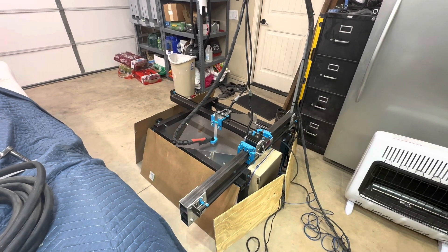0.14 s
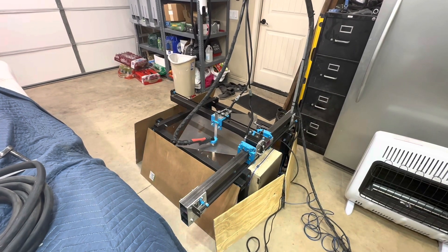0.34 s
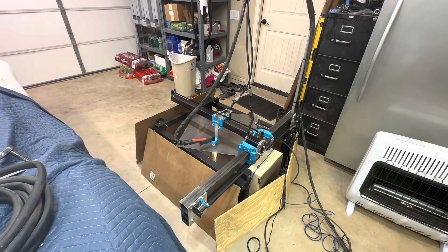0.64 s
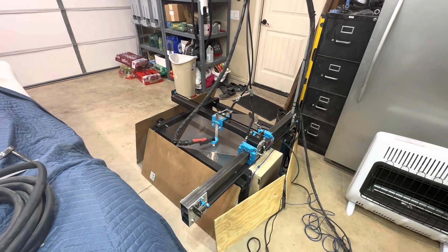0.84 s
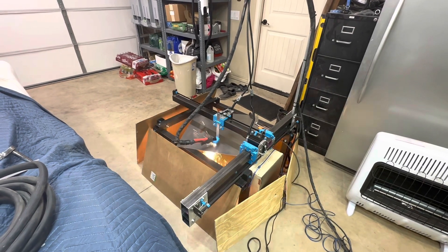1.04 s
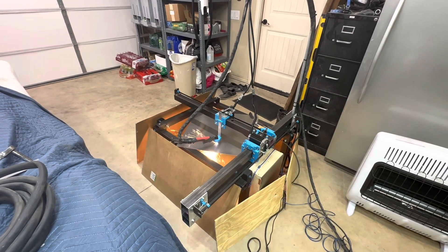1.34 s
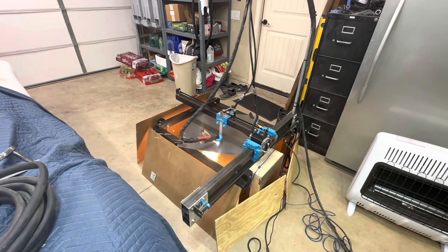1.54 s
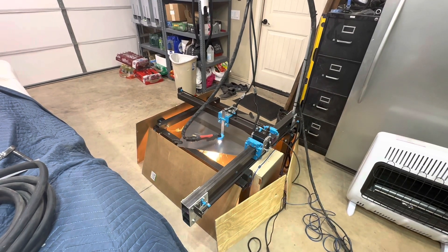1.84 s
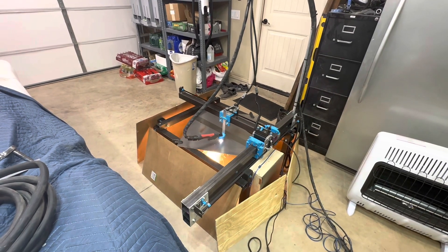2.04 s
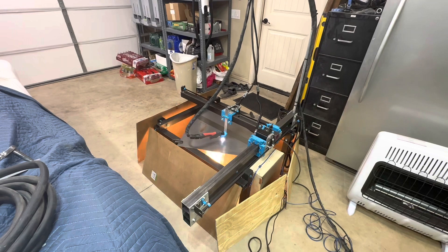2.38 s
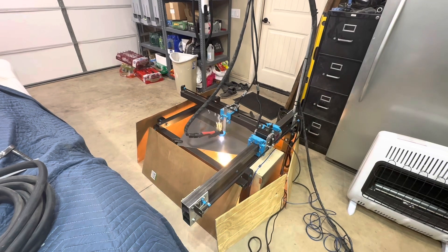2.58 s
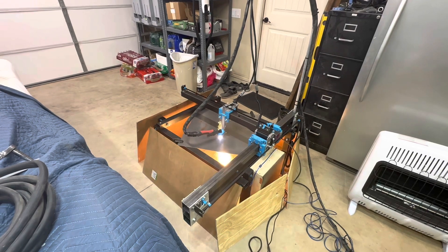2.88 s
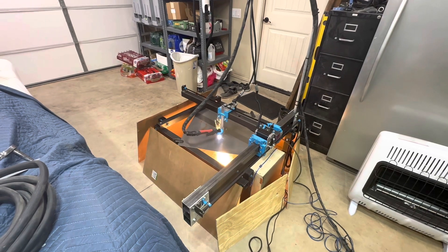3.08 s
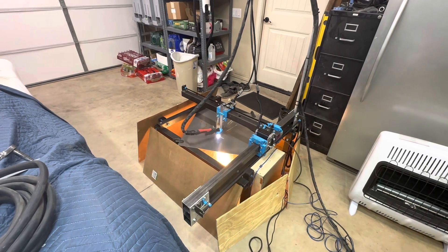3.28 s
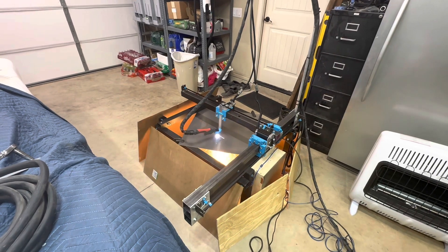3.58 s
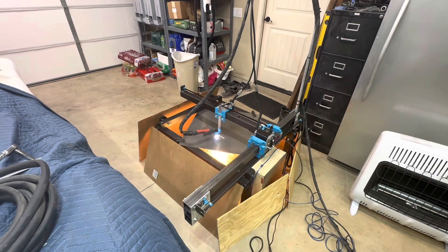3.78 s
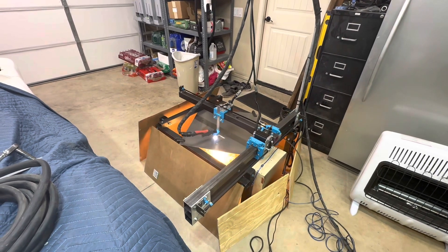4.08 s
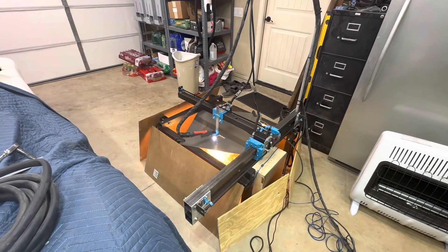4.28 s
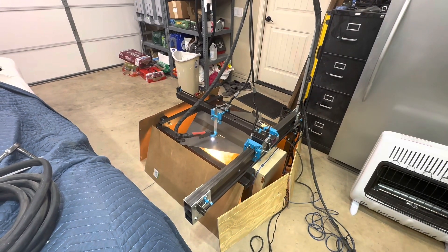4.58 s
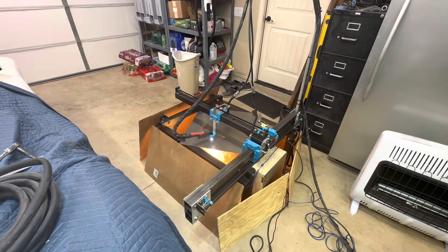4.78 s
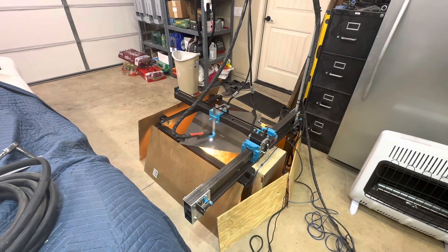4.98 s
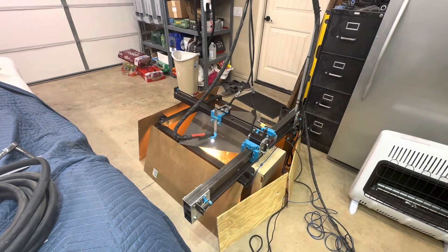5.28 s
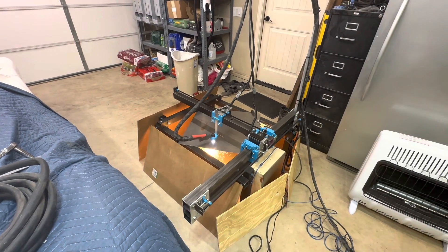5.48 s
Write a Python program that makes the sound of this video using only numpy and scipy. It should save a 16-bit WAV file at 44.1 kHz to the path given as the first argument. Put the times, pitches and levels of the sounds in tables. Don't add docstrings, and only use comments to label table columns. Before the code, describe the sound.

A plasma torch strikes with a thump and air blast, shrieks briefly while piercing sheet metal, then hisses steadily in a garage.

```python
import sys
import numpy as np
from scipy import signal
from scipy.fft import rfft, irfft
from scipy.io import wavfile
from scipy.ndimage import uniform_filter1d

SR = 44100
rng = np.random.default_rng(int(sys.argv[2]) if len(sys.argv) > 2 else 0)


def persist_wave(psi):
    counts = np.round(np.clip(psi, -1, 1) * 32767).astype(np.int16)
    wavfile.write(sys.argv[1], SR, np.atleast_2d(counts).T)


def linear_from_db(decibels):
    return 10 ** (np.asarray(decibels, float) / 20)


N = 248283
HOP = 256


def evened(x):
    return x / np.sqrt(np.mean(x ** 2) + 1e-20)


def read(points, hz, axis=1):
    table = np.transpose(points)
    return np.interp(np.log(hz + 1), np.log(table[0] + 1), table[axis])[:, None]


def drift(frames, low_hz, high_hz):
    t = np.arange(frames) * HOP / SR
    rates_hz = np.geomspace(low_hz, high_hz, num=40)
    return evened(sum(np.sin(2 * np.pi * (f * t + rng.random())) / np.sqrt(f) for f in rates_hz))


def bump(t, middle_s, half_length_s, db):
    return db * np.exp(-((t - middle_s) / half_length_s) ** 2)


# start_s, level_db, focus_db (toward the listener)
JET_COURSE = [(0.0, -51, 7.5), (0.026, -28.5, -1), (0.061, -25, -8), (0.11, -26, -2.5), (0.17, -28.5, 1.5),
              (0.24, -33, 2), (0.4, -34.5, 2), (0.58, -36, -2), (0.76, -39.5, 5.5), (0.9, -36, 0),
              (1.15, -38.5, 2), (1.75, -37, 1), (2.6, -36, 1), (2.9, -36.5, 3.5), (3.3, -37, 2),
              (3.6, -35, -0.5), (4.9, -36, 0.5), (5.63, -35, -1)]
# pitch_hz, level_db (per Hz)
JET_COLOUR = [(55, -10), (110, -15.5), (200, -15), (350, -11.5), (440, -17), (560, -9.5), (850, -7.5),
              (1300, -1.5), (4600, 1.5), (7600, 0), (11000, 0), (13000, -2.5), (15500, -1), (17000, -3)]
# pitch_hz, width_hz, level_db
SLOT_RINGS = [(5765, 870, 0), (9200, 400, -14)]
# start_s, pitch_hz, level_db (against the jet colour)
CRATER = [(.02, 2100, 4), (.055, 2070, 7), (.12, 1480, -14), (.2, 1190, 5.5), (.27, 1050, -2.5),
          (.33, 1000, -12)]
# pitch_hz, width_hz, level_db
TRAY_MODES = [(492.6, 55, -5), (680, 64, -4.5), (814, 93, -5), (1000, 47, -7), (1115, 220, -4),
              (1480, 99, -3)]
# middle_s, half_length_s, level_db
POOL_CHURN = (0.37, 0.09, 2.8)
# middle_s, half_length_s, level_db
SLOT_CHOKED = (0.47, 0.14, -11)
CUT_DB = -36.5
RING_DB, RING_FOCUS, RING_WAVER_DB = 2, 1.1, 1.5
FIZZ_DB, FIZZ_FOCUS = 0.86, 1
RUMBLE_DB, RUMBLE_WAVER_DB = 0.25, 0.7
RUMBLE_FOLLOWS = 0.57


def jet_spectrum(hz, t, patchy_db=0.36, swell_db=.5, flutter_db=0.5):
    frames, hz_down = len(t), hz[:, None]
    patches = rng.standard_normal((len(hz), frames))
    patches = evened(uniform_filter1d(uniform_filter1d(patches, size=14, axis=0), size=12, axis=1))
    s, level_db, focus_db = np.transpose(JET_COURSE)
    focus_db = np.interp(t, s, focus_db)
    excess_db = np.interp(t, s, level_db) - CUT_DB
    ring_db = RING_DB + RING_FOCUS * focus_db + RING_WAVER_DB * drift(frames, 1.5, 20)
    ring_db = ring_db + bump(t, *SLOT_CHOKED)
    fizz_db = FIZZ_DB + FIZZ_FOCUS * focus_db
    rumble_db = RUMBLE_DB - (1 - RUMBLE_FOLLOWS) * excess_db
    rumble_db = rumble_db + bump(t, *POOL_CHURN) + RUMBLE_WAVER_DB * drift(frames, 1.5, 20)

    high = 1 / (1 + (3000 / (hz_down + 1)) ** 4)
    top = 1 / (1 + (9500 / (hz_down + 1)) ** 8)
    low = 1 / (1 + (950 / (hz_down + 1)) ** -8)
    power = linear_from_db(2 * (read(JET_COLOUR, hz) + top * fizz_db + low * rumble_db))

    rings = [(centre_hz, width_hz, db + ring_db) for centre_hz, width_hz, db in SLOT_RINGS]
    when, crater_hz, crater_db = np.transpose(CRATER)
    rings.append((np.interp(t, when, crater_hz), 450, np.interp(t, when, crater_db, -60, -60)))
    rings += [(centre_hz, width_hz, db + rumble_db) for centre_hz, width_hz, db in TRAY_MODES]
    for centre_hz, width_hz, db in rings:
        power = power + linear_from_db(2 * db) * np.exp(-(2 * (hz_down - centre_hz) / width_hz) ** 2)
    flutter = high * (swell_db * drift(frames, 1.464, 12) + flutter_db * drift(frames, 8, 80))
    return np.sqrt(power) * linear_from_db(patchy_db * patches + flutter)


# pitch_hz, left_over_right_db
PORT_TILT = [(200, 0.5), (440, -0.5), (800, -0.5), (1300, 0.6), (2200, 0.2), (4200, -0.9), (5200, 1.5),
             (6400, 5), (7600, 2), (9200, -4), (10500, -5.5), (17000, 2)]
# pitch_hz, likeness (0-1), left_lead_rad
PORTS = [(50, 1, -0.5), (200, 0.7, -0.5), (350, 0.75, 0.88), (428, 0.8, 2.5), (507, 0.7, 1.5),
         (800, 0.2, 1), (1350, 0.08, 1), (6860, 0, -6.5), (8930, 0.24, 3.5)]
# pitch_hz, likeness (signed)
TOP_PORTS = [(10000, -.2), (10450, -.75), (11850, -.78), (13200, 0), (13300, .8), (17000, .8)]


def ports_hiss(hz, frames, ripple_db=1.36, echoed=0.68):
    a, b, c, d, comb_l, comb_r, path = rng.standard_normal((7, len(hz), frames))
    comb_l, comb_r, path = (evened(uniform_filter1d(v, size=70, axis=1)) for v in (comb_l, comb_r, path))
    ripple_db = ripple_db * (hz[:, None] > 400)
    upper = hz[:, None] > TOP_PORTS[0][0]
    same = np.where(upper, read(TOP_PORTS, hz), np.clip(read(PORTS, hz), 0, 1))
    lead = np.where(upper, 0, read(PORTS, hz, axis=2))
    share = echoed * ~upper
    left = a + 1j * b
    other = share * left * np.exp(2j * path) + np.sqrt(1 - share ** 2) * (c + 1j * d)
    right = same * left * np.exp(-1j * lead) + np.sqrt(1 - same ** 2) * other
    tilt_db = read(PORT_TILT, hz) / 2
    comb_right = same ** 2 * comb_l + (1.5 - same ** 2) * comb_r
    return np.array([left * linear_from_db(tilt_db + ripple_db * comb_l), right * linear_from_db(ripple_db * comb_right - tilt_db)])


# start_s, level_db (of the gas flow before it)
ARC_STRIKE = (.0225, -11)


def jet():
    frames, hz = N // HOP + 5, np.fft.rfftfreq(1024, 1 / SR)
    size = jet_spectrum(hz, np.arange(frames) * HOP / SR)
    hiss = signal.istft(ports_hiss(hz, frames) * size, nperseg=1024, noverlap=768)[1][:, :N]
    t = np.arange(N) / SR
    s, level_db, _ = np.transpose(JET_COURSE)
    lit_s, gas_db = ARC_STRIKE
    unlit_db = gas_db * np.clip((lit_s - t) / 0.0052, 0, 1) * np.clip(t / lit_s, 0, 1)
    return hiss * linear_from_db(np.interp(t, s, level_db) - 12.5 + unlit_db)


# start_s, pitch_hz, level_db, unsteadiness_hz
SHRIEK_STAGES = [(0.065, 4906, -18, 90), (.088, 4990, -32, 59.5), (0.15, 4995, -15, 34),
                 (.225, 4854, -17, 200), (0.263, 4645, -15.5, 300), (0.299, 4660, -19, 70),
                 (.44, 4495, -17.5, 267.7), (.662, 4593, -27.5, 343), (0.734, 4660, -32, 80.3),
                 (.785, 4830, -37, 200), (.835, 5410, -28, 420), (.908, 4965, -28, 70),
                 (.94, 4970, -46, 90)]
# start_s, end_s
SHRIEK_SPAN = (.05, 1.0)
# start_s, end_s, pitch_hz, level_db
SIDE_WHISTLES = [
    (0.024, 0.12, 3395, -29),
    (.16, 0.23, 4110, -26.5),
]
JUMP_S, GLIDE_S = .008, 0.0339
SAG_SHARE, SAG_SETTLE_S = 0.393, .08
OCTAVE_DB, OCTAVE_GROWTH = -6.5, .3
OCTAVE_KNEE_HZ, OCTAVE_LOSS_DB_PER_HZ = 4967, 1.1
LOCKED_HZ = 70


def shriek(gusty_db=3.5):
    t = np.arange(N) / SR
    table = np.transpose(SHRIEK_STAGES)
    stage = np.maximum(np.searchsorted(table[0], t) - 1, 0)
    start_s, hz, level_db, slip_hz = table[:, stage]
    held_s = np.maximum(t - start_s, 0)
    hz = hz - SAG_SHARE * slip_hz * (1 - np.exp(-held_s / SAG_SETTLE_S) - .5)
    first_s, last_s = SHRIEK_SPAN
    level_db = np.where((t > table[0, 0]) & (t < last_s), level_db, -60)
    level_db = uniform_filter1d(level_db, size=round(JUMP_S * SR))
    hz, slip_hz = uniform_filter1d([hz, slip_hz], size=round(GLIDE_S * SR), axis=1)

    octave_db = OCTAVE_DB + OCTAVE_GROWTH * (level_db - table[2].max())
    octave_db = octave_db - OCTAVE_LOSS_DB_PER_HZ * np.maximum(hz - OCTAVE_KNEE_HZ, 0)
    noise = rng.standard_normal((2, N))
    wander, gusts = (evened(uniform_filter1d(uniform_filter1d(v, size=70), size=70)) for v in noise)
    turn = 2 * np.pi * np.cumsum(hz + slip_hz * (wander - .15 * wander ** 2)) / SR
    detuned_db = 2.4 * (slip_hz * wander / 260) ** 2
    tone = np.cos(turn) + linear_from_db(octave_db) * np.cos(2 * turn)
    tone = tone * linear_from_db(level_db + 1.5 - detuned_db) * (t > first_s) * (t < last_s)

    for start, end, side_hz, db in SIDE_WHISTLES:
        swell = np.abs(np.sin(np.pi * np.clip((t - start) / (end - start), 0, 1)))
        tone = tone + linear_from_db(db) * swell * np.cos(2 * np.pi * np.cumsum(side_hz + 25 * wander) / SR)
    gust_db = gusty_db * np.minimum(slip_hz / LOCKED_HZ, 1) * np.clip(gusts, -3, 1.6)
    return np.sqrt(2) * tone * linear_from_db(gust_db)


# start_s, level_db (peak), pitch_hz, t60_s
THUMPS = [
    (0.023, -25, 91.5, 0.047),
    (0.056, -21, 118, 0.016),
    (0.072, -29, 56.5, 0.07),
]


def thumps():
    out, t = np.zeros(N), np.arange(6000) / SR
    for s, db, hz, t60 in THUMPS:
        push = linear_from_db(db - 60 * t / t60) * np.sin(2 * np.pi * hz * t) * (1 - np.exp(-t / 0.0013))
        out[round(s * SR):][:len(t)] += push
    return out


# pitch_hz, level_db (rms)
HUM_TONES = [(118.4, -70), (301.8, -57.5), (500.6, -65)]
STRAIN_DB, STRAIN_S = 15.5, 0.36
RECOVER_DB, RECOVER_S = -5, 0.69


def hum(waver_db=1.5):
    t, frames = np.arange(N) / SR, N // HOP + 2
    load_db = bump(t, 0, STRAIN_S, STRAIN_DB) + bump(t, 0, RECOVER_S, RECOVER_DB)
    out = np.zeros(N)
    for hz, db in HUM_TONES:
        waver = np.interp(t, np.arange(frames) * HOP / SR, drift(frames, .5, 5))
        out += np.sqrt(2) * linear_from_db(db + load_db + waver_db * waver) * np.sin(2 * np.pi * hz * t)
    return out


# pitch_hz, t60_s
GARAGE_DECAY = [(300, 0.28), (3000, 0.33), (10000, 0.18)]


def garage(x):
    taps = np.zeros((2, SR // 2))
    at = np.arange(100, SR // 2 - 20, 20) + rng.integers(0, 20, (2, (SR // 2 - 101) // 20))
    np.put_along_axis(taps, at, rng.choice([-1., 1.], at.shape), 1)
    hz, t, z = signal.stft(taps, SR, nperseg=256)
    tail = signal.istft(z * linear_from_db(-60 * t / read(GARAGE_DECAY, hz)), SR, nperseg=256)[1]
    return signal.fftconvolve(x[None], tail / np.linalg.norm(tail[0]), axes=1)[:, :N]


# pitch_hz, ripple_db
ROOM_RIPPLE = [(40, 3), (1500, 3), (4000, 1.5), (9000, 1)]


def standing_waves(x):
    hz = np.fft.rfftfreq(N, 1 / SR)
    noise = rng.standard_normal((3, len(hz)))
    both, *own = (evened(uniform_filter1d(uniform_filter1d(v, size=60), size=60)) for v in noise)
    ripple = np.where((hz < 400) | (hz > TOP_PORTS[0][0]), both, np.array(own))
    return irfft(rfft(x) * linear_from_db(read(ROOM_RIPPLE, hz)[:, 0] * ripple - 1), N)


def scene():
    tone = shriek()
    direct = np.array([tone * linear_from_db(-4), np.roll(tone, shift=2) * linear_from_db(-5.0)])
    torch = standing_waves(jet()) + direct + linear_from_db(-2.5) * garage(tone)
    return torch + thumps() + hum() * linear_from_db(np.array([[.1], [-.1]]))


# pitch_hz, squeeze (0-0.5)
WEAK_LINES = [(500, 0.016), (2000, 0.078), (6000, 0.22), (9000, 0.26), (13000, 0.2)]
# low_hz, high_hz
PASSBAND = (48, 15760)


def joint_stereo(x, margin_db=3.5, from_hz=10000):
    hz, t, z = signal.stft([x[0] + x[1], x[0] - x[1]], SR, "cosine", nperseg=2048, noverlap=1024)
    band = np.arange(len(hz)) // 16
    power = np.add.reduceat(abs(z) ** 2, np.arange(0, len(hz), 16), axis=1) + 1e-20
    z = z * (16 * abs(z) ** 2 / power[:, band] + 1e-9) ** np.clip(read(WEAK_LINES, hz), 0, .5)
    power = uniform_filter1d(power, size=3, axis=2)
    lead_db = 10 * np.log10(power[0] / power[1])[band] * (hz[:, None] > from_hz)
    low_hz, high_hz = PASSBAND
    passed = (hz[:, None] < high_hz) / np.sqrt(1 + (low_hz / (hz[:, None] + 1)) ** 24)
    kept = z * passed * np.array([lead_db > -margin_db, lead_db < margin_db])
    mid, side = signal.istft(kept, SR, "cosine", nperseg=2048, noverlap=1024)[1][:, :N] / 2
    return np.array([mid + side, mid - side])


def roll_off(x):
    return signal.sosfilt(signal.butter(12, 15940, fs=SR, output="sos"), x)


def record(dry, ceiling=.95):
    mix = joint_stereo(ceiling * np.tanh(dry / ceiling))
    return roll_off(mix)


dry = scene()
out = record(dry)
persist_wave(out)
```